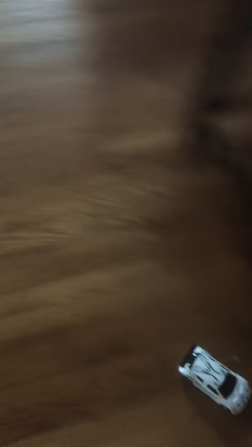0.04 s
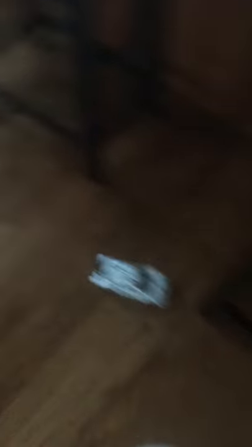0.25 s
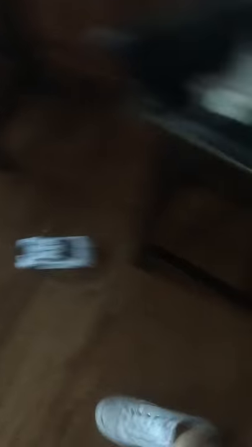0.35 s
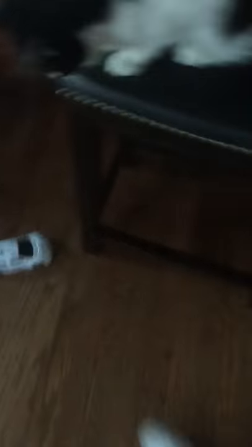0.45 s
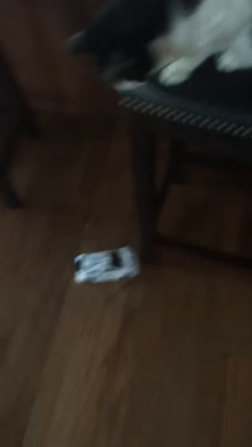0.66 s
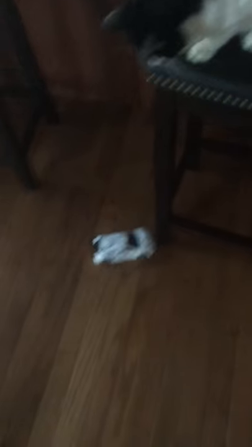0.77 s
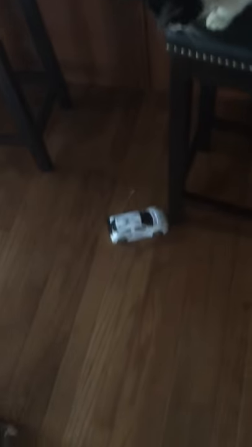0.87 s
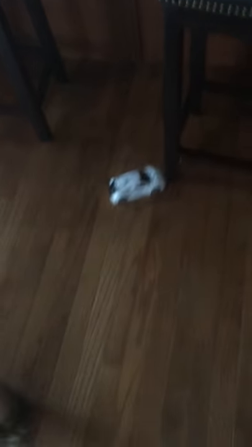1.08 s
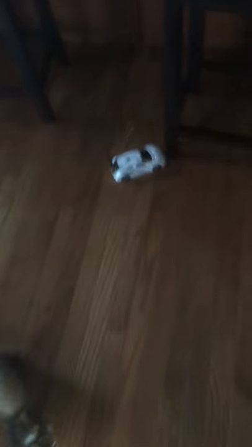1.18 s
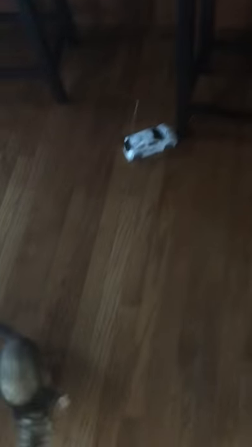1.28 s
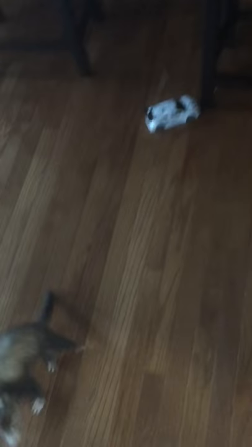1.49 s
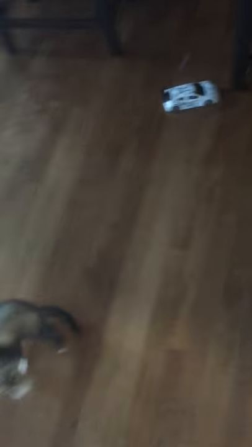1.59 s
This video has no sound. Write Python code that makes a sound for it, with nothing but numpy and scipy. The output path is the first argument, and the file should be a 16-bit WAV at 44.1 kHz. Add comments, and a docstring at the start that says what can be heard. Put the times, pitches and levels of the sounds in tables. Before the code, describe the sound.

A small toy car whirrs and rattles across a wooden floor, bumping hard twice.

```python
"""Toy car on a wooden floor

A small plastic motor car drives away in a furnished room, its motor whirring and its gears rattling.
It bumps hard twice, so that its shell rings and the boards thump, rolls out, clicks and starts again.
A tiny bell, perhaps on a cat's collar, tinkles faintly over the room's low rumble."""
import sys
import numpy as np
from scipy import signal
from scipy.fft import rfft, irfft
from scipy.io import wavfile

SR = 44100
rng = np.random.default_rng(int(sys.argv[2]) if len(sys.argv) > 2 else 0)


def generate_wav(signal):
    """Clip the signal to [-1, 1] and save it as 16-bit WAV at the path in sys.argv[1]."""
    frames = np.transpose(np.atleast_2d(signal))
    scaled = np.clip(frames, -1, 1) * 32767
    pcm = np.round(scaled).astype(np.int16)
    wavfile.write(sys.argv[1], SR, pcm)


N = 72765
T = np.arange(N) / SR

# The car's run. Each row: time in seconds, rattle in dB, whirr in dB, treble tilt in dB per octave.
DRIVE_CURVES = [(0, -32.5, -27.5, 2), (.06, -32.5, -34, 0), (.105, -31.5, -40.5, 1),
                (.135, -34.5, -29, 0.5), (.2, -36.5, -27.5, 2), (.29, -42.5, -34, 3.5),
                (.37, -32, -62, -1.5), (.42, -43, -41, -1.5), (.5, -41.5, -49, -6.5),
                (.58, -42, -40.5, -10), (.66, -47.5, -40.5, -7), (.72, -39.5, -38.5, -2),
                (.79, -38.5, -37, 1), (.88, -39.5, -42, -7), (1.0, -48.5, -45, -5.5),
                (1.1, -44.5, -40, -13), (1.22, -53, -44, -11), (1.27, -69, -56.5, -4.5),
                (1.518, -56, -66, -18), (1.524, -74, -43, -13), (1.571, -53, -53, -10.5),
                (1.577, -57, -37, -7), (1.605, -54, -41, -1), (1.65, -44, -35.5, -3)]
# Tone of the gear rattle. Each row: frequency in Hz, relative level in dB.
RATTLE_TONE = [(100, 0), (350, -2.5), (700, 0), (900, 3.5), (1400, 2.5), (2000, 3), (2750, 1.5), (3400, -1),
               (4200, -2), (5000, -6.5), (7000, -8), (10000, -15), (15500, -22)]
# The motor's whine, which sags under load. Each row: time in seconds, pitch in Hz.
MOTOR_PITCH = [(0, 1090), (.06, 1100), (.13, 1000), (.2, 1000), (.33, 965), (.45, 975), (.6, 1030),
               (.7, 1070), (.9, 1070), (1.1, 1040), (1.24, 1030), (1.53, 1060), (1.6, 1010), (1.65, 1015)]
# Shell resonances that the motor chatters in. Each row: frequency in Hz, width in Hz, level in dB.
CHATTER_PEAKS = [(895, 113, -8.5), (1006, 45, -7.5), (1144, 97, -5.5), (1575, 78, -10.5),
                 (2640, 100, -14.5)]
# The car's bumps. Each row: start in seconds, crack level in dB, rise in seconds, treble tilt in dB
# per octave, shell ring in dB, floor thump in dB, thump delay in seconds.
BUMPS = [(0.2086, -7.5, 0.00065, 1, -10.5, -5.5, 0.02), (0.307, -16.5, 0.00067, 1.5, -13.5, -38, 0.004),
         (0.351, -29, 0.0014, 0.5, -27, -35, 0.0155), (0.651, -49, .001, 3, -50, -57, .05),
         (0.728, -18, 0.00013, 1.5, -19, -20, 0.0092), (.848, -31.5, 0.0011, -1.5, -27, -32.5, .03),
         (1.194, -47, 0.0014, 0, -56, -68, .05)]
# The plastic's crack. Each row: frequency in Hz, relative level in dB, fade in seconds.
# A fade (t60) is the time a sound takes to drop by 60 dB.
CRACK_TONE = [(147, -10, 0.29), (490, 3, 0.063), (778, -6.5, 0.14), (1092, 5.5, 0.22), (1404, -4, 0.033),
              (1530, 2, .09), (2770, -6, 0.11), (4320, -6.5, 0.026), (4630, -15, 0.086), (7400, -13, 0.037),
              (12000, -20.5, 0.071), (16000, -29, 0.071)]
# Notes of the struck shell. Each row: frequency in Hz, level in dB, fade in seconds.
SHELL_MODES = [(968, -3.5, 0.12), (1113, -13.5, 0.17), (1527, -4.5, 0.067), (1601, -12, 0.13),
               (1856, -24.5, 0.39), (2170, -13.5, 0.16), (2379, -16.5, 0.098), (2773, -11, 0.058),
               (3950, -12, 0.069)]
# Notes of the floorboards. Each row: frequency in Hz, level in dB, fade in seconds.
BOARD_MODES = [(85, -4, 0.1), (127.6, -2.5, 0.15), (158.1, -1, 0.17), (180.8, 5, 0.065), (212.7, 11, 0.068),
               (250.6, 0, 0.18), (308, -14.5, 0.29), (457, -26, 0.22), (490, -17, 0.091)]
# Clicks as the car stands, perhaps its steering. Each row: start in seconds, level in dB.
CLICK_EVENTS = [(1.303, -49.5), (1.3984, -35)]
# Tone of the clicks. Each row: frequency in Hz, relative level in dB.
CLICK_TONE = [(300, -9), (1000, 4), (1900, -3), (2150, 4), (2450, 4), (2700, 4), (3300, -1), (4500, -15.5),
              (7000, -25.5), (15000, -36)]
# The wheels' rumble on the boards. Each row: time in seconds, level in dB.
WHEEL_LEVEL = [(0, -43), (.09, -39), (.14, -39), (.45, -62), (.56, -43.5), (.66, -54), (.715, -43),
               (.76, -50), (.95, -49), (1.02, -55), (1.11, -47), (1.2, -49), (1.65, -62)]
# Tone of that rumble. Each row: frequency in Hz, relative level in dB.
WHEEL_TONE = [(25, -42), (50, -29), (75, 7.5), (110, -21.5), (250, -11.5), (600, -23), (900, -18.5),
              (2000, -74)]
# Shakes of the bell. Each row: start in seconds, level in dB, treble tilt in dB per octave.
BELL_SHAKES = [(1.058, -53, 3), (1.072, -45, -15), (1.236, -44, -10), (1.248, -46.5, -12), (1.286, -56, 5),
               (1.3, -50, -22), (1.339, -59, 10), (1.469, -60, 4), (1.526, -60, 2), (1.549, -52, -3),
               (1.597, -45, -10)]
# Notes of the bell. Each row: frequency in Hz, level in dB, fade in seconds.
BELL_MODES = [(4160, 8, 0.028), (10100, -10, 0.099), (10890, -15, .06)]
# The room's echo. Each row: frequency in Hz, level in dB, fade in seconds.
ROOM_ECHO = [(80, -9.5, 0.79), (256, -8.5, .5), (600, -6.5, 0.54), (1200, -10.5, 0.56), (3000, -6, 0.38),
             (6800, -7.5, 0.42), (15000, -19, 0.11)]
# The room's rumble and hiss. Each row: time in seconds, level in dB.
BACKGROUND_LEVEL = [(0, -46.5), (.45, -42), (.9, -46), (1.18, -46), (1.28, -41.5), (1.48, -41.5),
                    (1.65, -47.5)]
# Tone of that background. Each row: frequency in Hz, relative level in dB.
BACKGROUND_TONE = [(25, -16), (45, -2.5), (70, 3.5), (100, -4), (140, 2), (190, -1), (240, -5), (310, -4),
                   (400, -17), (600, -19.5), (900, -20), (1600, -35), (4000, -38), (8000, -49.5),
                   (15000, -46.5)]


def drive():
    """Gear teeth tick densely, duller as the car gets further away, while the motor whirrs."""
    rattle_db, whirr_db, slope = in_time(DRIVE_CURVES)
    teeth_per_s, spread_db, flutter_db = 5000, 1.5, 1.5
    teeth = (rng.random(N) < teeth_per_s / SR) * rng.choice([-1, 1], N)
    teeth = teeth * from_db(spread_db * np.minimum(rng.exponential(1, N), 4))  # some hit harder
    rattle = coloured(teeth * from_db(flutter_db * drift(hz=55.556)), RATTLE_TONE)
    rattle = sum(band * tilt(hz, slope) for hz, band in bands(rattle))
    return from_db(rattle_db) * rattle + from_db(whirr_db) * whirr()


def whirr():
    """The motor's unsteady whine and its chatter in the shell throb together."""
    jitter_hz, throb_db = 45.14, 3
    pitch_hz = in_time(MOTOR_PITCH)[0] + jitter_hz * drift(hz=68.8)
    motor = from_db(-0.5) * rms_one(np.sin(2 * np.pi * np.cumsum(pitch_hz) / SR))
    for hz, width, db in CHATTER_PEAKS:
        chatter = signal.lfilter(*signal.iirpeak(hz, hz / width, fs=SR), noise())
        motor += from_db(db) * rms_one(chatter)
    return rms_one(motor * from_db(throb_db * drift(hz=55.3)))


def bumps():
    """The plastic cracks, treble first; the shell rings and the car drops on the boards."""
    out, crack = np.zeros(N), bands(coloured(noise(), CRACK_TONE))
    for start, db, rise, slope, shell_db, thump_db, delay in BUMPS:
        for hz, band in crack:
            swell_s = 0.0014 * (1000 / hz)  # low bands take longer to rise
            envelope = burst(start, rise + swell_s, hold=0.0035, t60=at_hz(CRACK_TONE, hz, axis=2))
            out += from_db(db) * tilt(hz, slope) * band * envelope
        out += from_db(shell_db) * ring(SHELL_MODES, start + 0.006, rise)
        out += from_db(thump_db) * ring(BOARD_MODES, start + delay, rise=0.0048)
    return out


def clicks():
    """Short, dry snaps of plastic."""
    envelope = sum(from_db(db) * burst(start, rise=0.00085, hold=0.0035, t60=0.065)
                   for start, db in CLICK_EVENTS)
    return coloured(noise(), CLICK_TONE) * envelope


def wheels():
    """The rolling wheels make the boards rumble."""
    return from_db(in_time(WHEEL_LEVEL)[0]) * coloured(noise(), WHEEL_TONE)


def bell():
    """The pellet rolls and chatters in the little bell at every shake."""
    rings = np.zeros(N)
    for start, db, slope in BELL_SHAKES:
        gain = from_db(db) / tilt(BELL_MODES[0][0], slope)  # the tilt leaves the lowest note alone
        rings += gain * ring(BELL_MODES, start, rise=0.0025, slope_db=slope)
    chatter = 1 + 0.4 * drift(hz=150)
    return rings * chatter


def room(x):
    """Echoes from all around build up and die away, the treble soonest."""
    response = np.zeros(N)
    for hz, band in bands(noise()):
        tail = burst(start=0, rise=0.016, hold=0, t60=at_hz(ROOM_ECHO, hz, axis=2))
        response += from_db(at_hz(ROOM_ECHO, hz)) * band * tail / np.sqrt(np.sum(tail ** 2))
    return signal.fftconvolve(x, response)[:N]


def background():
    """The room's low rumble and faint hiss swell and sink."""
    return from_db(in_time(BACKGROUND_LEVEL)[0]) * coloured(noise(), BACKGROUND_TONE)


def ring(modes, start, rise, slope_db=0):
    """A struck object rings with fading notes, made brighter or duller by the given treble tilt."""
    return sum(from_db(db) * tilt(hz, slope_db) * burst(start, rise, 0, t60)
               * np.sin(2 * np.pi * hz * (T - start)) for hz, db, t60 in modes)


def burst(start, rise, hold, t60):
    """A loudness shape that rises, holds and fades; all times in seconds."""
    age = np.maximum(T - start, 0)
    attack = 1 - np.exp(-age / max(rise, 1e-5))
    fade_db = -60 * np.minimum(np.maximum(age - hold, 0) / t60, 2)
    return attack * from_db(fade_db)


def tilt(hz, db_per_octave):
    """Gain of a treble slope that starts at 2.5 kHz."""
    return from_db(db_per_octave * np.log2(max(hz / 2500, 1)))


def noise():
    """White noise."""
    return rng.standard_normal(N)


def drift(hz):
    """A random wobble of typical size 1, mostly slower than hz."""
    lowpass = signal.butter(2, hz, fs=SR, output="sos")
    return rms_one(signal.sosfilt(lowpass, rng.standard_normal(2 * N))[N:])


def from_db(db):
    """Turn decibels into a gain."""
    return 10 ** (np.asarray(db) / 20)


def rms_one(x):
    """Scale a sound to an average strength (rms) of 1."""
    return x / np.sqrt(np.mean(x ** 2) + 1e-20)


def in_time(rows):
    """Turn a table over time into smooth curves, one for each column after the time."""
    times, *columns = np.transpose(rows)
    return [np.interp(T, times, column) for column in columns]


def at_hz(table, hz, axis=1):
    """Read a table's column at any frequency, with octaves evenly spaced."""
    rows = np.array(table)
    return np.interp(np.log(hz), np.log(rows[:, 0]), rows[:, axis])


def bands(x):
    """Split a sound into third-octave bands that sum to it: (centre Hz, band) pairs."""
    centres = np.geomspace(25, 16000, 29)
    spectrum, log_hz = rfft(x), np.log(np.arange(N // 2 + 1) * SR / N + 1)
    return [(hz, irfft(spectrum * np.interp(log_hz, np.log(centres), share), N))
            for hz, share in zip(centres, np.eye(len(centres)))]


def coloured(x, table):
    """Give a sound the tone in a table, at strength 1."""
    hz = np.arange(N // 2 + 1) * SR / N + 1
    return rms_one(irfft(rfft(x) * from_db(at_hz(table, hz)), N))


def scene():
    """Car and bell in the room, over its rumble."""
    direct = drive() + bumps() + clicks() + bell()
    return (direct + background() + room(direct) + wheels())[None]


def record(dry):
    """The microphone loses the deepest bass; the loudest peaks are rounded and the top is cut."""
    low_hz, top_hz = 49.5, 15900
    thin = signal.sosfilt(signal.butter(2, low_hz, "high", fs=SR, output="sos"), dry)
    rounded = .9 * np.tanh(thin / .9)
    return signal.sosfilt(signal.ellip(10, .1, 80, top_hz, fs=SR, output="sos"), rounded)


dry = scene()
out = record(dry)
generate_wav(out)
```